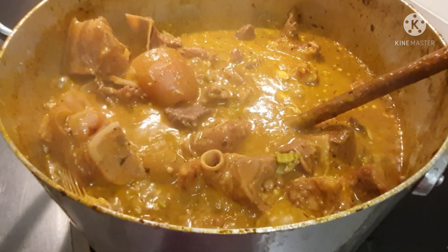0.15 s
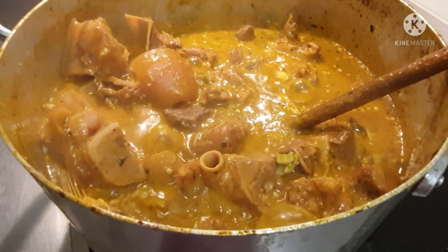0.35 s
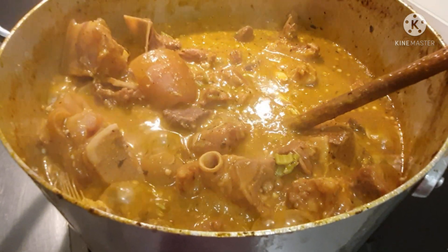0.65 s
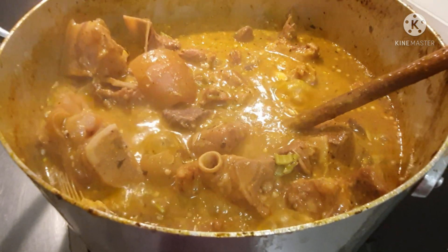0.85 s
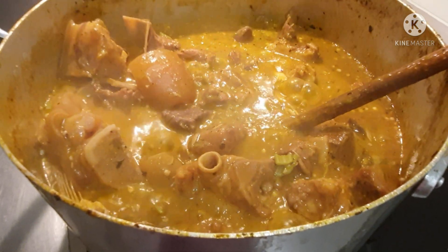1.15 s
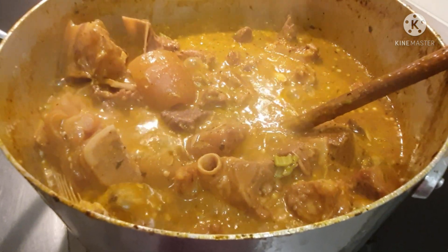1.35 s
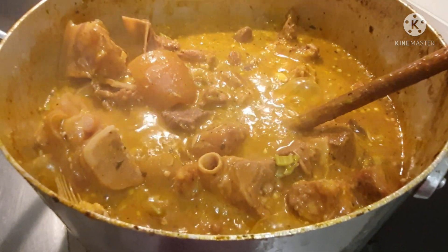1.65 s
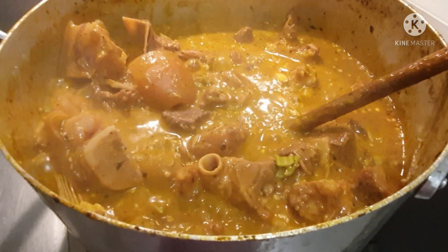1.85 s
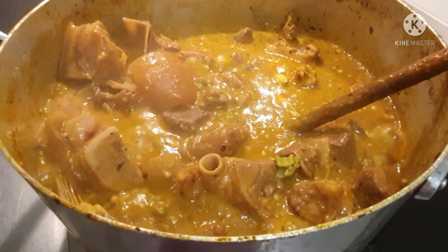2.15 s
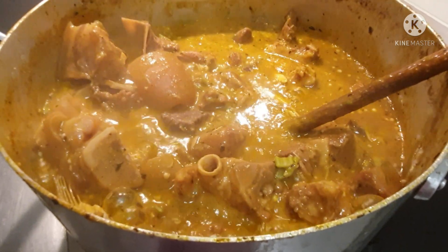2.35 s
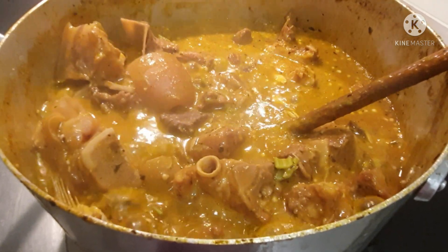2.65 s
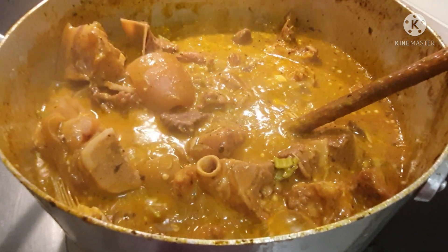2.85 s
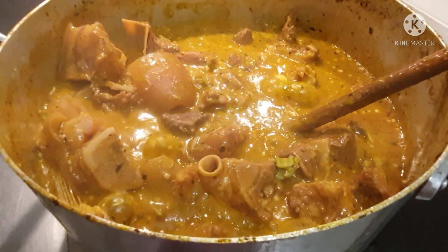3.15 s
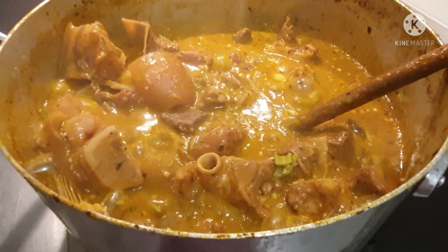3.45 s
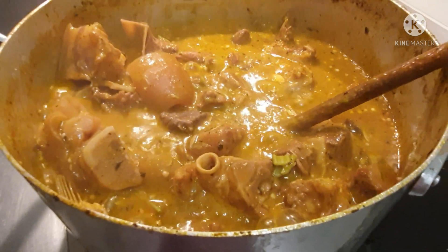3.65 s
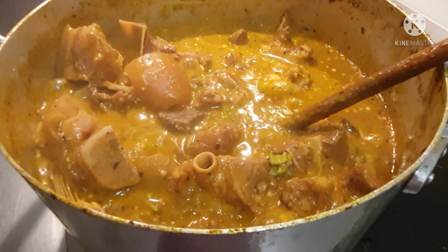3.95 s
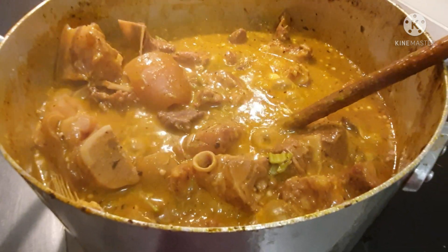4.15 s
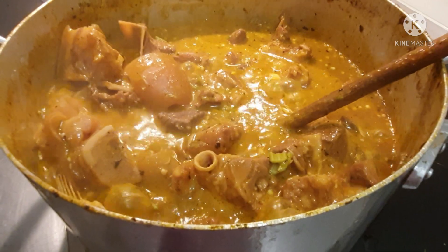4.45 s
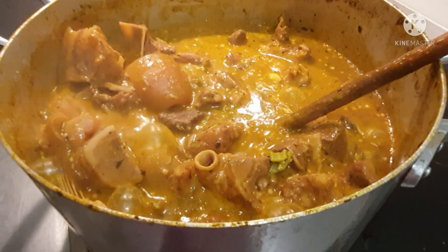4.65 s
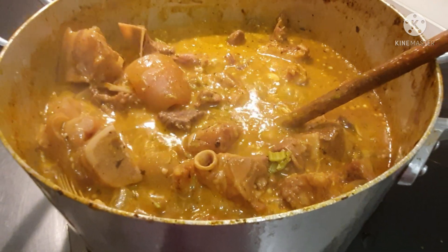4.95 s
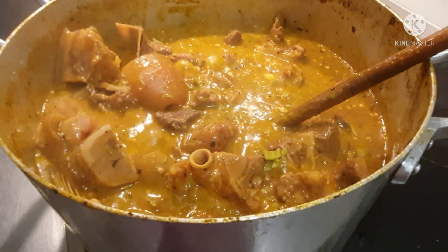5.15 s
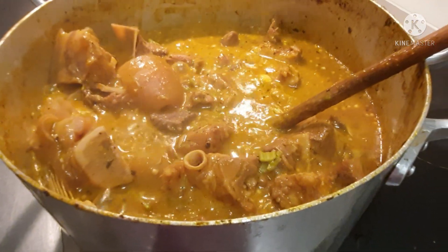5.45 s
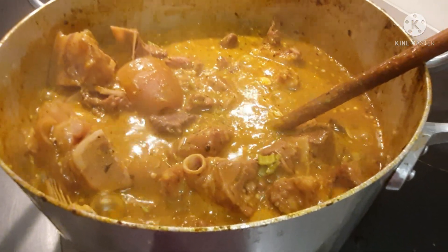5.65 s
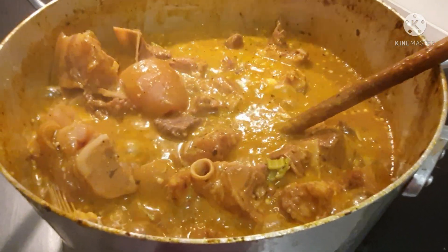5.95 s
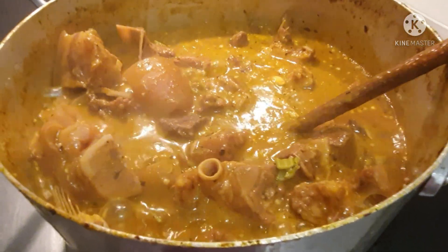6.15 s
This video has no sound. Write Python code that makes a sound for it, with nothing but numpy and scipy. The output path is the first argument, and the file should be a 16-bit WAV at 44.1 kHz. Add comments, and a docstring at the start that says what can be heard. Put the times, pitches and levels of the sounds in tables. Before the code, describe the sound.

Thick stew boils in a wide metal pot, heard in stereo from just above the rim in a small kitchen. From the start, wet bubbles burst in fast, irregular pops, mostly mid-high and very short, with bright snapping ones around 0.2 to 0.3 seconds and a dense run until 0.9. A hollow low hum near 300 Hz stays underneath, fading around 1 second and wavering after. From 1 to 2.9 seconds pops are more scattered, with glugs near 1.3, 1.65 and 2.1. At 3.0 a large steam pocket heaves with a deep glug, and loud pops cluster until 3.8. Bubbling thins slightly around 4.2, then thickens from 4.5 through 5.6, the hum swelling near 5.5. A strong cluster bursts at 6.1 before the end at about 6.3. Faint sizzle, droplet patter, soft churning rumble and light hiss persist; the left rings brighter, the right is more diffuse.

```python
"""At a stove, just above the rim of a pot: thick broth boils.
Steam pockets heave up with a glug and stir the broth: it rumbles, churns and keeps the pot's air humming near 300 Hz.
Bubbles burst in short pops that bounce between the pot's walls, each clear one setting off a weaker neighbour.
Fat sizzles faintly, droplets patter, and the left microphone port rings near 2.3 kHz.
Bubbles are short swelling sines; simmer, broth and hum are shaped noise."""
import sys
import numpy as np
from scipy import signal
from scipy.fft import rfft, irfft
from scipy.io import wavfile
from scipy.ndimage import uniform_filter1d

SR = 44100
rng = np.random.default_rng(int(sys.argv[2]) if len(sys.argv) > 2 else 0)


def digitize_waveform(pressure):
    """Quantize a signal to 16-bit integers and store it at the path in sys.argv[1].

    Rows of a 2-D input are taken as channels; values are limited to [-1, 1].
    """
    field = np.atleast_2d(pressure).T
    bounded = np.clip(field, -1, 1)
    quanta = np.round(bounded * 32767).astype(np.int16)
    wavfile.write(sys.argv[1], SR, quanta)


N = 278712
TIME = np.arange(N) / SR
HUM_HZ = 301.7

# clearest bursts: (time [s], level [dB], pitch [Hz], swell [cycles], snap of the tearing film [dB])
BURSTS = [(.054, -16.5, 2510, 0.91, -34.5), (.07, -17, 1870, .3, -33.5), (0.1082, -24, 1364, 0.49, -40),
          (0.1236, -20.5, 1570, 0.3, -28), (.147, -19, 2410, 0.46, -38), (0.1807, -23, 2300, 1.3, -18),
          (.1867, -11.5, 3600, .37, -25), (0.2582, -8, 3800, 0.35, -11), (.3106, -25.5, 870, 0.48, -34),
          (0.323, -23.5, 1070, .76, -20), (0.345, -14.5, 1560, .24, -18), (0.4151, -27.5, 1120, 1.6, -36),
          (0.4571, -14.5, 2040, 0.82, -30), (.474, -12, 1780, 0.64, -34), (0.5096, -15, 2400, 0.76, -34),
          (.525, -19.5, 2640, 0.45, -13), (0.5739, -21.5, 1430, 0.31, -40),
          (0.5863, -14.5, 2030, 0.45, -40), (0.7478, -26, 3320, 1.3, -16.5), (.8015, -14, 2050, 0.82, -9.5),
          (0.8221, -16, 1800, 0.5, -18), (0.8383, -22, 2210, 0.3, -24), (.924, -22.5, 760, 0.44, -40),
          (0.93, -23, 1480, 0.33, -40), (0.998, -20.5, 1900, 0.33, -40), (1.0096, -22.5, 2080, 0.24, -33),
          (1.0288, -19, 2770, 0.25, -30), (1.1197, -23.5, 2090, 0.33, -17),
          (1.2605, -16.5, 1160, 0.76, -40), (1.296, -20, 1640, 0.59, -37), (1.307, -11.5, 2000, .48, -40),
          (1.4024, -19, 3040, 0.4, -40), (1.42, -26, 1880, 0.72, -35), (1.5279, -19.5, 1180, .78, -25),
          (1.5744, -14.5, 2340, 0.47, -40), (1.6501, -23, 980, 0.49, -37), (1.8126, -11.5, 2700, 0.34, -32),
          (1.9233, -21, 3240, 1.7, -42), (2.0865, -16.5, 1070, 0.8, -25), (2.1193, -23, 1170, 0.71, -21),
          (2.1767, -26.5, 2070, .6, -36), (2.2902, -31, 1860, 1.6, -17), (2.2986, -25.5, 2260, 1.4, -18),
          (2.371, -22, 2720, .32, -15), (2.3954, -20.5, 870, 0.16, -40), (2.5521, -14.5, 1440, 0.55, -25),
          (2.5963, -16, 1570, 0.33, -40), (2.604, -20, 1760, 0.56, -40), (2.6323, -17.5, 2250, .36, -38),
          (2.7918, -17, 1730, 0.47, -38), (2.797, -28, 1140, 1.4, -40), (2.8553, -20.5, 1760, 0.72, -21),
          (3.0317, -19.5, 1450, 2, -37), (3.0416, -11.5, 1850, 0.61, -34), (3.051, -13, 2280, .48, -10.5),
          (3.08, -12, 1600, 0.72, -26), (3.1433, -17, 2540, 0.7, -18), (3.158, -20, 1880, 0.18, -38),
          (3.2223, -14.5, 2640, 0.45, -11.5), (3.2799, -16, 1270, 0.79, -34), (3.308, -10, 1650, 0.41, -40),
          (3.345, -13, 2560, 0.85, -40), (3.3684, -21, 2830, 0.7, -40), (3.49, -24, 1110, 0.85, -36),
          (3.506, -29, 990, 1.3, -40), (3.5168, -22.5, 1340, 0.63, -35), (3.539, -18, 2030, 0.37, -30),
          (3.5491, -18.5, 2030, 0.41, -40), (3.5631, -17.5, 2320, 0.42, -40),
          (3.5903, -19.5, 3480, 0.69, -18), (3.7274, -20.5, 1610, 0.3, -32),
          (3.7379, -14.5, 2400, 0.67, -25), (3.7473, -15, 3020, 0.31, -42), (3.763, -27.5, 1110, 0.71, -20),
          (3.8178, -16, 1600, 0.46, -40), (3.962, -23.5, 1030, 1, -30), (3.969, -19, 1480, 0.54, -40),
          (4.0238, -23.5, 3300, 1.1, -38), (4.0619, -21.5, 1290, 0.38, -42),
          (4.1135, -14.5, 2230, 0.43, -15), (4.127, -24.5, 1030, 1.1, -30), (4.3517, -15, 1710, 0.76, -40),
          (4.398, -22, 3300, .67, -19.5), (4.4934, -25, 2590, 0.4, -15), (4.5476, -10, 3170, 0.39, -44),
          (4.661, -17, 1190, 0.57, -34), (4.6911, -24, 875, 0.48, -15), (4.7388, -20, 2360, 0.74, -27),
          (4.749, -13.5, 2190, 0.43, -37), (4.823, -18, 2100, 0.24, -44), (4.892, -21, 1120, 0.28, -25),
          (4.9142, -15, 1740, 0.36, -47), (4.9261, -19.5, 1520, 0.33, -31), (4.949, -18.5, 2430, 0.65, -38),
          (4.9595, -21, 2300, 0.71, -40), (5.039, -21.5, 2640, 0.83, -28), (5.0704, -14, 2060, 0.49, -16.5),
          (5.0772, -14, 2160, 0.45, -31), (5.1257, -18.5, 2200, 0.67, -22), (5.1403, -21, 2550, 0.5, -25),
          (5.1985, -17, 1390, 0.54, -40), (5.2621, -17.5, 1370, 0.15, -33),
          (5.3112, -15.5, 1840, 0.34, -29), (5.366, -25.5, 2300, 0.83, -19), (5.48, -19.5, 2240, 0.42, -22),
          (5.5459, -14.5, 1530, 0.41, -33), (5.5554, -16, 2320, 0.62, -16), (5.6214, -23.5, 2100, .4, -20),
          (5.835, -12.5, 1860, 1.5, -14.5), (5.8687, -20, 1900, 0.44, -21), (5.9857, -26, 1040, 1.2, -20),
          (6.1119, -11, 1720, 0.41, -40), (6.1285, -21, 2070, 0.33, -40), (6.1436, -8.5, 2160, 0.62, -26.5),
          (6.1483, -9, 2630, 0.55, -11), (6.1855, -24.5, 1660, 1.8, -21)]
# steam pockets: (time [s], glug level [dB], glug pitch [Hz], boom of the pot's air [dB],
#                 stirring hold [s], stirring over the calm boil [dB])
STEAM_POCKETS = [(.049, -35, 111, -39, .04, 6), (.115, -52, 100, -31.5, .04, 3),
                 (.305, -31, 130, -38, .05, 6), (.37, -46, 112, -37.5, .22, 5),
                 (.625, -44, 75, -32.5, .05, 3), (.925, -46, 129, -41, .11, 5),
                 (1.291, -43, 95, -34.5, .05, 8), (1.491, -40, 111, -48, .04, 2),
                 (1.645, -33, 99, -62, .05, 6), (1.69, -48, 89.6, -37, .14, 5),
                 (2.085, -30.5, 88.5, -38, .03, 8), (2.184, -37, 86, -48, .03, 2),
                 (2.385, -41, 122, -39, .05, 3.5), (2.499, -44, 90.5, -42, .1, -5),
                 (3.006, -24.5, 115, -34.5, .12, 10), (3.209, -30.5, 87, -47, .03, 5),
                 (3.289, -35, 99, -33.5, .08, 8), (3.536, -47, 128, -58, .08, 1),
                 (4.565, -43, 86, -37, .03, 5), (4.66, -34, 116, -37, .08, 7),
                 (4.914, -34, 103, -43, .05, 5), (5.253, -49, 116, -42, .06, 2.5),
                 (5.435, -51, 90, -36, .05, 4), (5.537, -42, 109, -53, .03, 4),
                 (5.58, -40, 89, -29, .04, 5), (5.768, -41, 88.5, -50, .05, 3),
                 (6.12, -41, 82, -36, .09, 8), (6.26, -33, 97, -47, .03, 7)]
# slow course of the simmer: (time [s], level [dB])
SIMMER_COURSE = [(0.0, -50), (0.4, -51), (0.83, -53), (4.05, -53), (4.35, -55), (4.94, -51), (5.1, -53),
                 (6.32, -52)]


def gain_of(db):
    """Decibels to amplitude."""
    return 10 ** (np.asarray(db) / 20)


def slow_gain(curve):
    """A level curve as a gain for every sample."""
    return gain_of(np.interp(TIME, *np.transpose(curve)))


def read(points, hz, axis=1):
    """Reads one column of a spectrum on a log-frequency axis."""
    table = np.transpose(points)
    return np.interp(np.log(hz + 1), np.log(table[0] + 1), table[axis])


def evened(x):
    """Scales to an rms of one."""
    return x / np.sqrt(np.mean(x ** 2) + 1e-20)


def coloured(x, points, axis=1):
    """Gives x a spectrum and an rms of one."""
    weights = gain_of(read(points, np.fft.rfftfreq(N, 1 / SR), axis))
    return evened(irfft(rfft(x) * weights, N))


def steadied(x, seconds):
    """Takes the slow swells out of a noise."""
    power = uniform_filter1d(x ** 2, max(int(seconds * SR), 2))
    return x / np.sqrt(abs(power) + 1e-12)


def highpass(x, order, hz):
    """Causal Butterworth high-pass."""
    return signal.sosfilt(signal.butter(order, hz, "highpass", fs=SR, output="sos"), x)


def add(mix, time_s, sound):
    """Adds a sound into the mix at a time."""
    part = mix[max(round(time_s * SR), 0):][:len(sound)]
    part += sound[:len(part)]


def kitchen(x, gap_s=0.0058):
    """Diffuse reverberation after a short gap, each band of noise dying at its own speed."""
    # (frequency [Hz], t60 [s])
    decay_times = [(150, 0.12), (1000, 0.3), (3000, 0.22), (10000, 0.28)]
    hz, t, z = signal.stft(rng.standard_normal(SR // 2), SR, nperseg=256)
    decay = gain_of(-60 * t / read(decay_times, hz)[:, None])
    tail = signal.istft(z * decay, SR, nperseg=256)[1]
    tail = tail * (np.arange(len(tail)) > gap_s * SR)
    return signal.oaconvolve(x, tail / np.linalg.norm(tail))[:N]


def simmer(db=4, ticks_per_s=1500, spread_db=-0.5):
    """Fat and tiny bubbles tick along the hot wall: random impulses of either sign, coloured."""
    # (frequency [Hz], relative level [dB])
    tick_spectrum = [(300, -24), (700, -6), (1200, 3), (2400, 1), (3300, 1.5), (5000, -2), (6500, -10),
                     (10000, -12), (16000, -14)]
    size = gain_of(spread_db * np.minimum(rng.exponential(1, N), 5)) * rng.choice([-1, 1], N)
    ticks = size * (rng.random(N) < ticks_per_s / SR)
    return gain_of(db) * slow_gain(SIMMER_COURSE) * coloured(ticks, tick_spectrum)


def stirring(rise_s=.02, settle_s=.03):
    """How hard the broth moves, one when calm: each steam pocket lifts it quickly, holds it and lets it settle."""
    t, power = TIME[::64], 1
    for time_s, *_, hold_s, db in STEAM_POCKETS:
        rise = np.clip(1 + (t - time_s) / rise_s, 0, 1)  # complete at time_s
        settle = np.exp(-np.maximum(t - time_s - hold_s, 0) / settle_s)
        power = power + (gain_of(db) * rise * settle) ** 2
    return np.interp(TIME, t, np.sqrt(power))


def hum(stir, width_hz=11, db=-1.0, follow=0.1):
    """The pot's air, kept sounding by the boil as narrow-band noise and swelling as the broth is stirred."""
    # (time [s], level [dB])
    hum_course = [(0.0, -42.5), (0.84, -44), (1.09, -53.5), (1.78, -47.5), (2.69, -52), (3.17, -44),
                  (3.48, -51.5), (4.35, -51), (4.56, -49), (5.54, -43), (5.86, -51.5), (6.32, -46.5)]
    f = np.fft.rfftfreq(N, 1 / SR)
    resonance = 1 / (1 + ((f - HUM_HZ) / width_hz) ** 2)
    tone = irfft(rfft(rng.standard_normal(N)) * resonance, N)
    return gain_of(db) * slow_gain(hum_course) * stir ** follow * steadied(tone, 0.14)


def rolling(stir, rumble_db=-52.0, churn_db=-49, churns_per_s=350, rumble_follow=0.84, churn_follow=0.55):
    """The stirred broth rumbles as low noise and churns in many soft random knocks."""
    # both: (frequency [Hz], relative level [dB])
    rumble_spectrum = [(20, -34), (36, -22), (50, -6), (68, -1.5), (95, 1), (130, -0.5), (160, -2.5),
                       (190, -27), (250, -7), (330, -7.5), (600, -81)]
    churn_spectrum = [(120, -24), (210, -6), (270, -13), (380, 1.5), (440, -5), (560, -4), (660, -3.5),
                      (800, 2.5), (1150, -28), (1600, -6.5), (2500, -10.5), (5000, -70)]
    rumble = steadied(coloured(rng.standard_normal(N), rumble_spectrum), 0.081)
    knocks = rng.standard_normal(N) * (rng.random(N) < churns_per_s / SR)
    churn = steadied(coloured(knocks, churn_spectrum), 0.13)
    rumble = gain_of(rumble_db) * stir ** rumble_follow * rumble
    return rumble + gain_of(churn_db) * stir ** churn_follow * churn


def bubble(hz, cycles, glide):
    """A bubble's cavity swells to a peak and dies in a few cycles; positive glide raises its pitch."""
    u = np.arange(int(8 * cycles / hz * SR) + 2) / SR * hz / cycles  # peak and nominal pitch at u = 1
    swell = (u * np.exp(1 - u)) ** 2
    return swell * np.sin(2 * np.pi * cycles * (u + glide * (u * u / 2 - u)))


def big_bubbles(rows, db, cycles, glide):
    """Large, slow bubbles with no snap."""
    out = np.zeros(N)
    for time_s, level_db, hz, *_ in rows:
        add(out, time_s, gain_of(level_db + db) * bubble(hz, cycles, glide))
    return out


def booms(db=-1.5, cycles=5, after_s=0.0079):
    """Each heave thumps the pot's air, which swells for a few hundredths of a second."""
    thumps = [(time_s + after_s, boom_db, HUM_HZ) for time_s, _, _, boom_db, _, _ in STEAM_POCKETS]
    return big_bubbles(thumps, db, cycles, 0)


def glugs():
    """Steam pockets heave up as low bubbles whose pitch sags slightly."""
    return big_bubbles(STEAM_POCKETS, db=-6.5, cycles=1.7, glide=-0.014)


def plops():
    """Wide blisters open as slow bubbles of rising pitch."""
    # (time [s], relative level [dB], pitch [Hz])
    blisters = [(.122, -30, 423), (.922, -27.5, 384), (1.258, -28.5, 390), (1.306, -31.5, 523),
                (1.811, -33.5, 372), (3.013, -29.5, 420), (3.278, -33, 382), (3.96, -50, 810),
                (4.555, -24.5, 520), (4.677, -31, 380), (5.26, -29, 396), (5.447, -26, 630),
                (5.6, -24.5, 700), (5.797, -31.5, 520)]
    return big_bubbles(blisters, db=-3.5, cycles=0.89, glide=0.13)


def off_walls(sound, scatter):
    """Adds the pot's wall reflections; their delays depend on where in the pot the bubble sits."""
    # (nominal delay [ms], share of the direct sound [ratio])
    echoes = [(1.654, 0.27), (2.601, 0.29), (4.346, 0.31)]
    out = np.zeros(len(sound) + SR // 100)
    add(out, 0, sound)
    for (delay_ms, share), shift in zip(echoes, rng.uniform(-1, 1, len(echoes))):
        add(out, delay_ms * (1 + scatter * shift) / 1000, share * sound)
    return out


def small_pops(stir, count=480, db=-36, spread_db=2.0, low_hz=950, high_hz=4600, cycles=0.59, follow=.4):
    """Little bubbles burst at random, more of them where the simmer is strong and the broth is stirred."""
    out = np.zeros(N)
    busy = np.cumsum(slow_gain(SIMMER_COURSE) ** 2 * stir ** follow)
    for when, size, pitch, ring in rng.random((count, 4)):
        loud = gain_of(db + spread_db * min(-np.log(1 - size), 3))
        sound = bubble(low_hz * (high_hz / low_hz) ** pitch, cycles * (.5 + ring), 0.088)
        time_s = np.searchsorted(busy, when * busy[-1]) / SR
        add(out, time_s, loud * off_walls(sound, 0.22))
    return out


def neighbour_pops(db=-17, spread_db=3, soonest_s=.01, latest_s=.035, octaves=0.91, cycles=0.87):
    """Each clear burst sets off a weaker bubble, up to nearly an octave higher or lower, a moment later."""
    out = np.zeros(N)
    draws = rng.random((len(BURSTS), 3))
    for (time_s, level_db, hz, _, _), (wait, strength, pitch) in zip(BURSTS, draws):
        sound = bubble(hz * 2 ** (octaves * (2 * pitch - 1)), cycles, 0.023)
        delay_s = soonest_s + (latest_s - soonest_s) * wait ** 2
        loud = gain_of(level_db + db + spread_db * (2 * strength - 1.5))
        add(out, time_s + delay_s, loud * off_walls(sound, 0.18))
    return out


def pops(snap_db=-1, snap_s=0.00038, snap_hz=7000, glide=0.012, scatter=0.061):
    """Each film tears with a short, soft noise snap and the opened cavity rings."""
    out, t = np.zeros(N), np.arange(SR // 200) / SR
    wet_film = signal.butter(1, snap_hz, fs=SR)
    for time_s, db, hz, cycles, tear_db in BURSTS:
        snap = rng.standard_normal(len(t)) * np.exp(-t / snap_s)
        snap = signal.lfilter(*wet_film, snap / np.linalg.norm(snap))
        burst = np.zeros(SR // 50)
        add(burst, 0, gain_of(db) * bubble(hz, max(cycles, .2), glide))
        add(burst, 0, gain_of(tear_db + snap_db) * snap)
        add(out, time_s, off_walls(burst, scatter))
    return out


def pot_air(x):
    """Every burst sets the air modes of the pot ringing as decaying cosines."""
    # (frequency [Hz], gain at resonance [dB], t60 [s])
    modes = [(280, 13, 0.11), (389, -0.5, 0.078), (542, 5, 0.034), (791, 5, 0.086), (954, 7, 0.042),
             (1142, -6.5, 0.27), (2234, -0.5, 0.032), (2590, -23, .05), (3027, -6, 0.056)]
    t = np.arange(SR // 4) / SR
    ring = np.zeros(len(t))
    for hz, db, t60_s in modes:
        unit_peak = 2 * np.log(1000) / (t60_s * SR)
        ring += unit_peak * gain_of(db - 60 * t / t60_s) * np.cos(2 * np.pi * hz * t)
    return x + signal.oaconvolve(x, ring)[:N]


def spray(x, db=-6, low_hz=3200, fall_s=0.0079, drops=0.081):
    """Droplets thrown up by each burst patter down just after it: its treble through sparse, fading impulses."""
    t = np.arange(SR // 12) / SR
    landed = rng.random(len(t)) < drops  # chance per sample
    patter = rng.standard_normal(len(t)) * landed * np.exp(-t / fall_s)
    bright = highpass(x, 3, low_hz)
    return gain_of(db) * signal.oaconvolve(bright, patter / np.linalg.norm(patter))[:N]


def around_rim(x, direct=0.25, scattered=0.97, spread_s=0.0056, split_hz=1200):
    """The right port faces away: bass bends round to it, treble arrives scattered off the stove and pot."""
    t = np.arange(SR // 50) / SR
    paths = rng.standard_normal(len(t)) * np.exp(-t / spread_s)
    treble = signal.sosfiltfilt(signal.butter(2, split_hz, "highpass", fs=SR, output="sos"), x)
    diffuse = signal.oaconvolve(treble, paths / np.linalg.norm(paths))[:N]
    return x + (direct - 1) * treble + scattered * diffuse


def scene(left_room_db=-11, right_room_db=-8, low_room_db=-13):
    """The pot reaches both ports; the room, the spray and the simmer differ between them."""
    stir = stirring()
    low = hum(stir) + booms() + rolling(stir) + glugs()
    bursts = pot_air(pops() + neighbour_pops() + small_pops(stir) + plops())
    sides = []
    for near, room_db in [(bursts, left_room_db), (around_rim(bursts), right_room_db)]:
        room = kitchen(gain_of(room_db) * bursts + gain_of(low_room_db) * low)
        sides.append(near + low + simmer() + spray(bursts) + room)
    return np.array(sides)


def held_back(x, hz=2350, width_hz=650):
    """The left port's duct stores sound near resonance for a millisecond (all-pass), rounding off each pop."""
    r = np.exp(-np.pi * width_hz / SR)
    poles = np.array([1, -2 * r * np.cos(2 * np.pi * hz / SR), r * r])
    return signal.lfilter(poles[::-1], poles, x)


def port(x, response, size=4096):
    """The colour of one microphone port as a minimum-phase filter."""
    log_gain = np.log(gain_of(read(response, abs(np.fft.fftfreq(size, 1 / SR)))))
    taps = np.fft.ifft(np.exp(np.conj(signal.hilbert(log_gain)))).real
    return signal.oaconvolve(x, taps[:size // 2])[:N]


def record(dry, left_hiss_db=-59, right_hiss_db=-54, low_cut_hz=45, edge_hz=15800):
    """Two unlike ports, their hiss, a low cut and the band limit."""
    # port responses: (frequency [Hz], gain [dB])
    left_response = [(100, 5.5), (450, 3.5), (700, -4.5), (1100, 0.5), (1850, 1), (2120, 7.5), (2300, 11),
                     (2700, 9), (3600, 2.5), (5000, 4.5), (7700, -3), (9800, -11), (11200, -5), (15500, 3)]
    right_response = [(100, -3), (300, -0.5), (550, -1.5), (800, -10), (1150, -7), (1700, -13.5),
                      (2300, -11.5), (3100, -14.5), (4200, -8.5), (6000, 2.5), (9000, 3.5), (15500, -1)]
    # (frequency [Hz], left relative level [dB], right relative level [dB])
    hiss_spectra = [(100, -25, 16), (3000, 13, 6.5), (5560, 6, -1), (7300, 15, 5), (10400, -10, -9),
                    (10750, 4.5, 6), (14800, 11, 2.5), (17100, -30, 0)]
    left_hiss = gain_of(left_hiss_db) * coloured(rng.standard_normal(N), hiss_spectra, axis=1)
    right_hiss = gain_of(right_hiss_db) * coloured(rng.standard_normal(N), hiss_spectra, axis=2)
    left = port(held_back(dry[0]), left_response) + left_hiss
    right = port(dry[1], right_response) + right_hiss
    both = highpass([left, right], 3, low_cut_hz)
    low_pass = signal.firwin(255, edge_hz, window=("kaiser", 9), fs=SR)
    return signal.oaconvolve(both, low_pass[None], "same", axes=1)


dry = scene()
out = record(dry)
digitize_waveform(out)
```